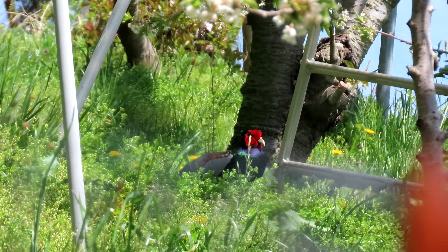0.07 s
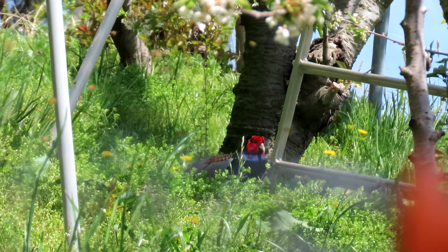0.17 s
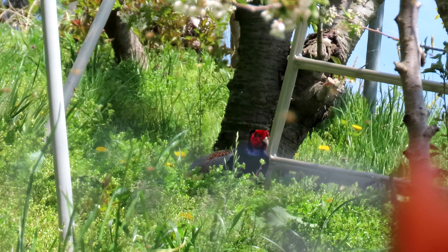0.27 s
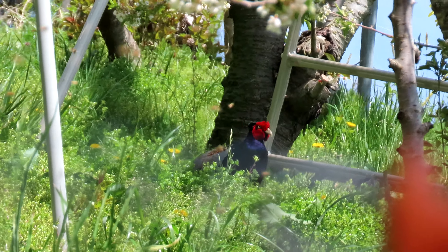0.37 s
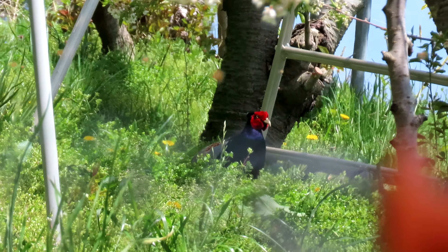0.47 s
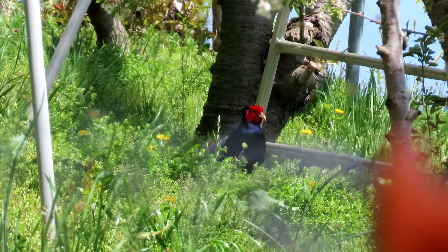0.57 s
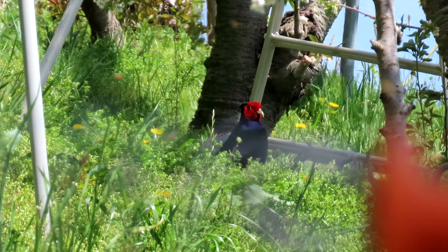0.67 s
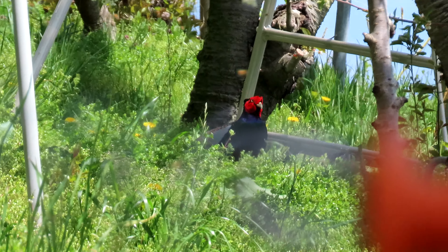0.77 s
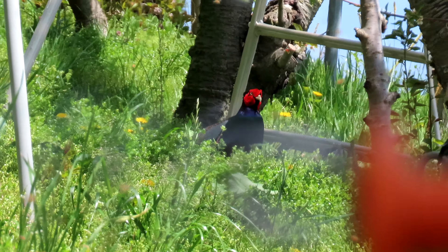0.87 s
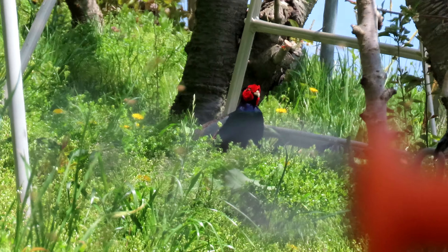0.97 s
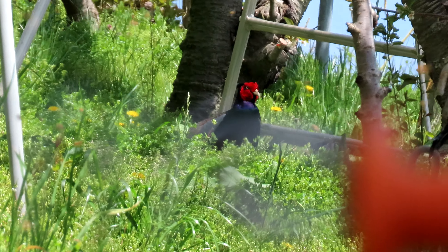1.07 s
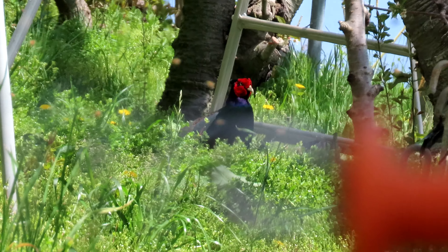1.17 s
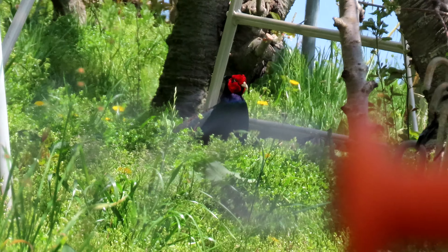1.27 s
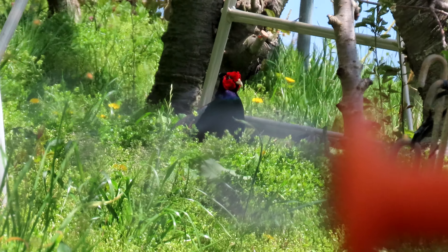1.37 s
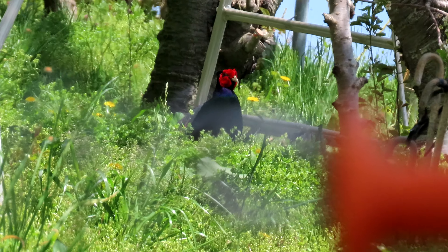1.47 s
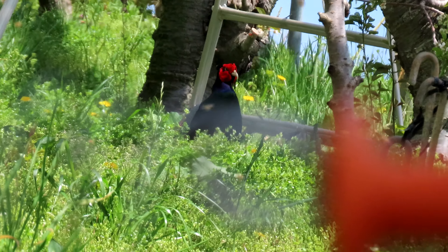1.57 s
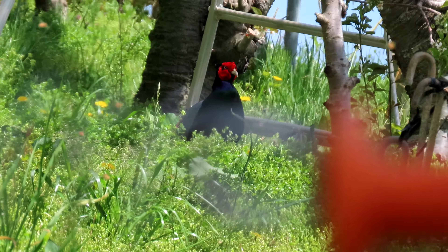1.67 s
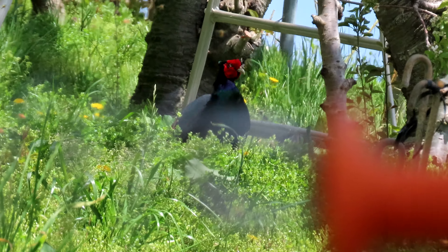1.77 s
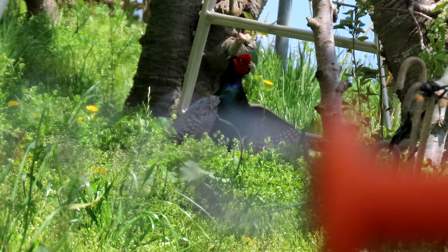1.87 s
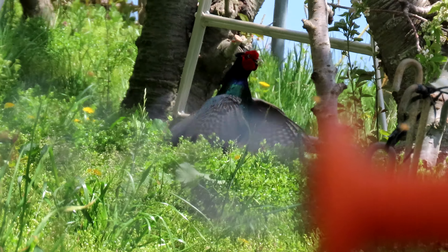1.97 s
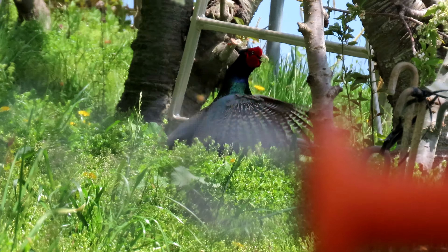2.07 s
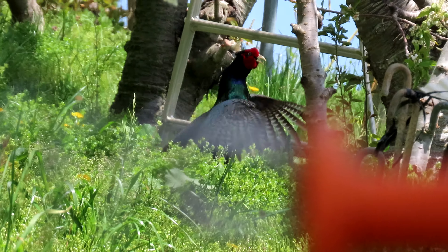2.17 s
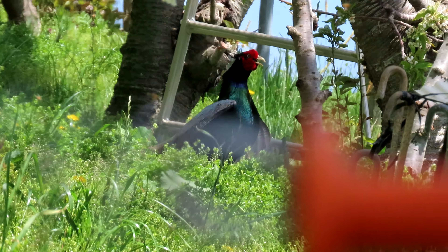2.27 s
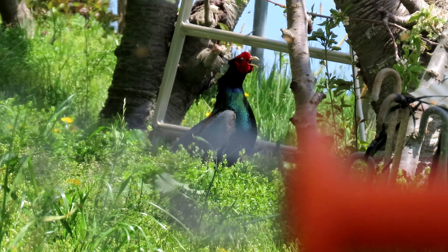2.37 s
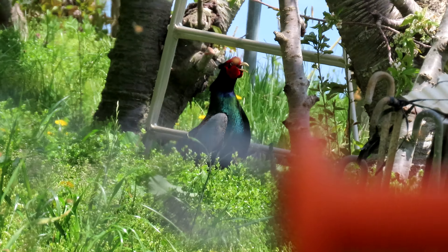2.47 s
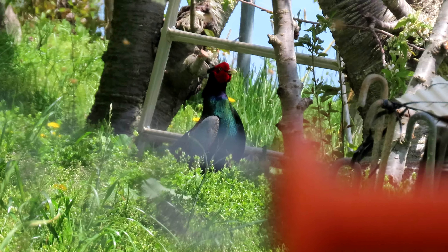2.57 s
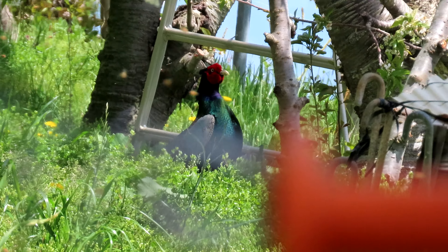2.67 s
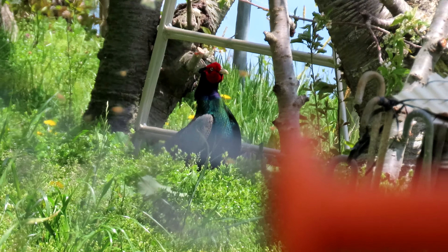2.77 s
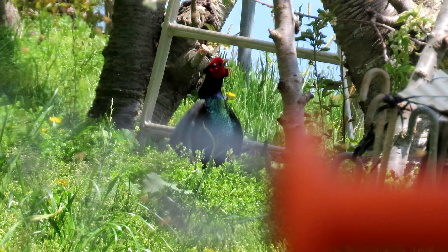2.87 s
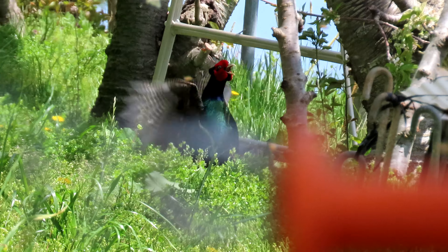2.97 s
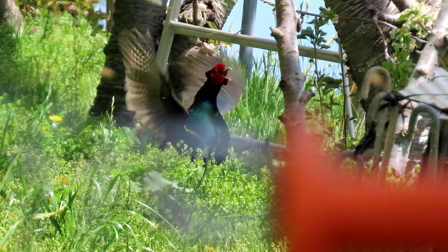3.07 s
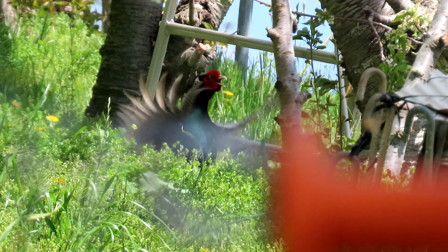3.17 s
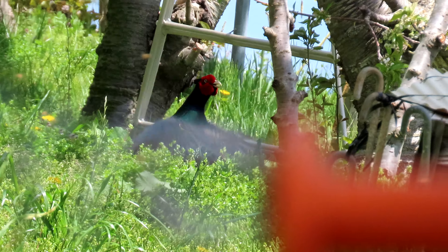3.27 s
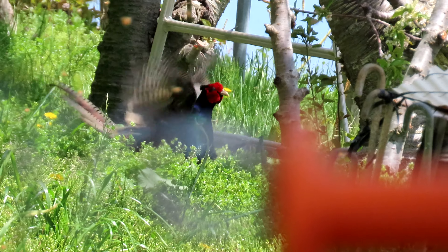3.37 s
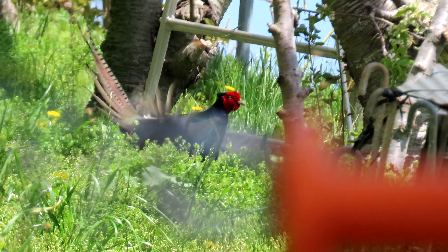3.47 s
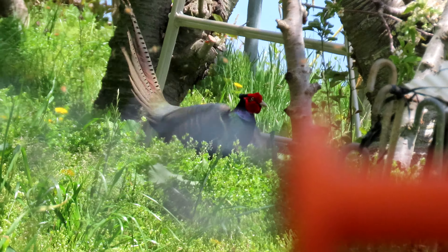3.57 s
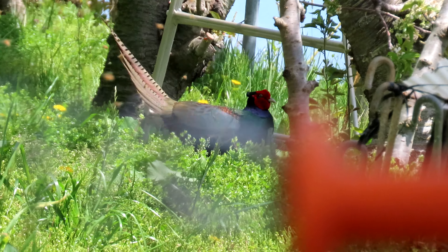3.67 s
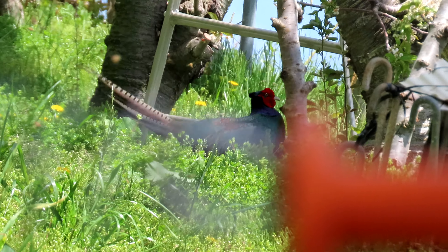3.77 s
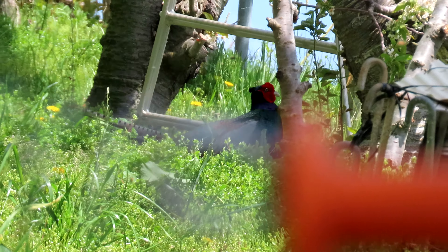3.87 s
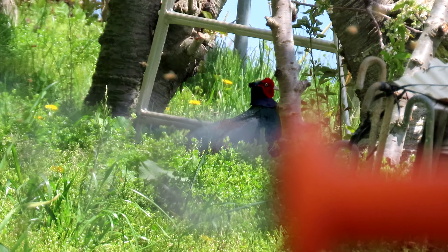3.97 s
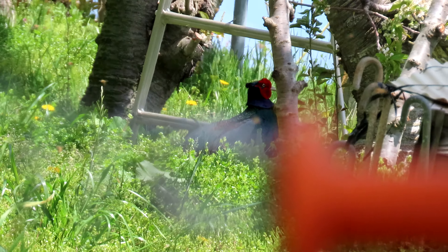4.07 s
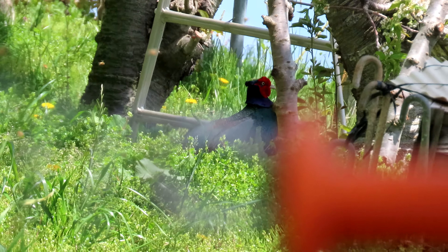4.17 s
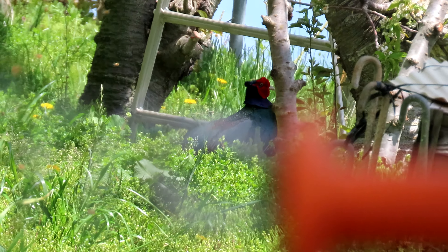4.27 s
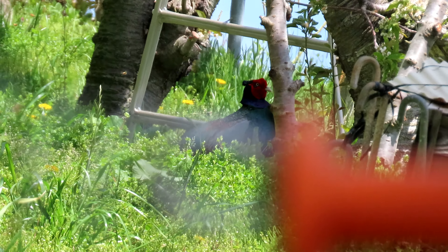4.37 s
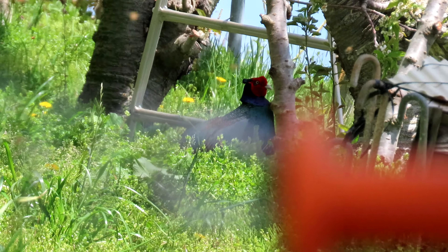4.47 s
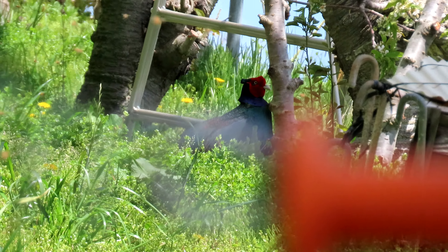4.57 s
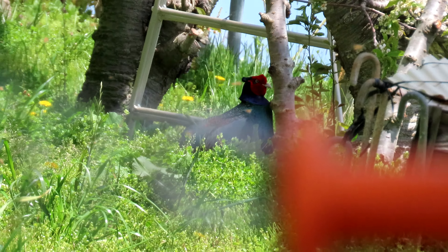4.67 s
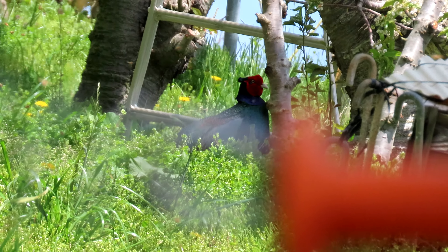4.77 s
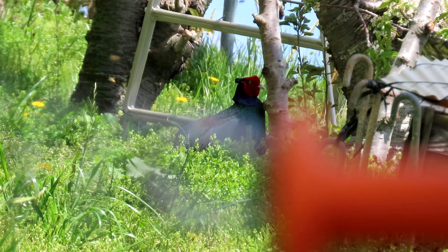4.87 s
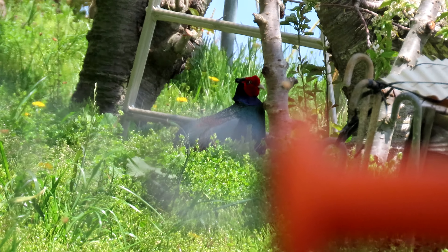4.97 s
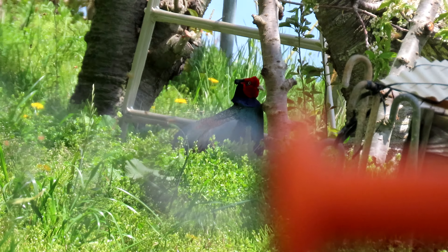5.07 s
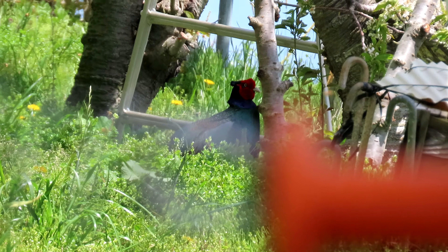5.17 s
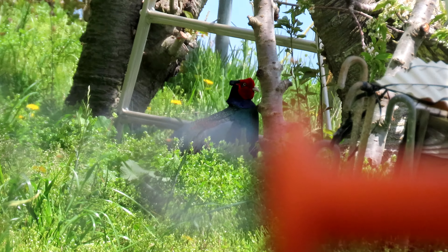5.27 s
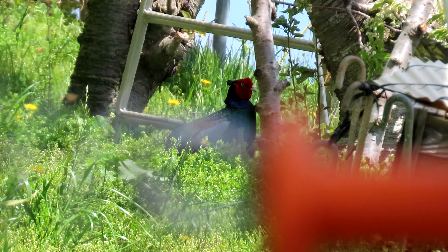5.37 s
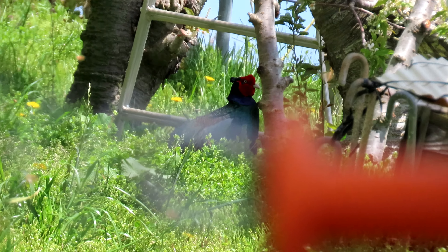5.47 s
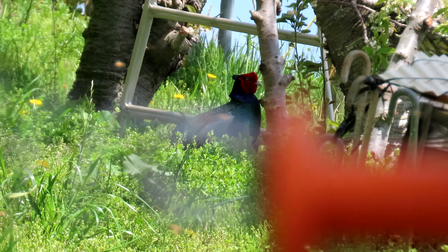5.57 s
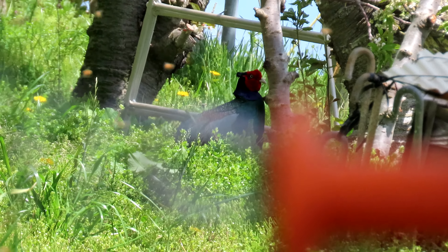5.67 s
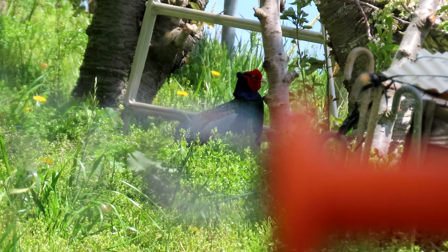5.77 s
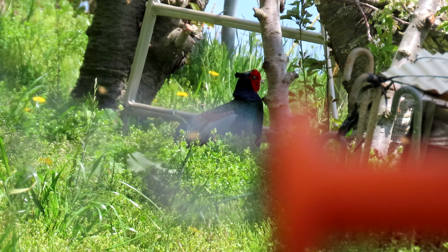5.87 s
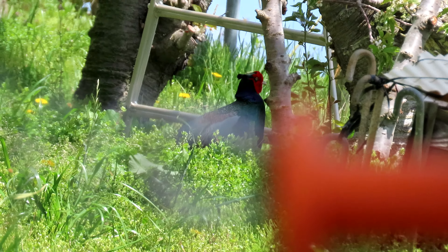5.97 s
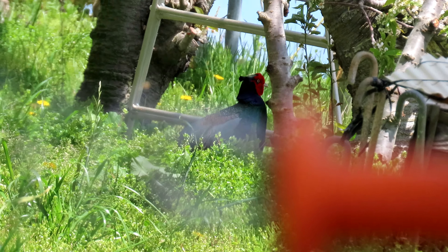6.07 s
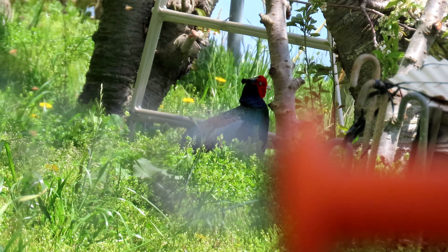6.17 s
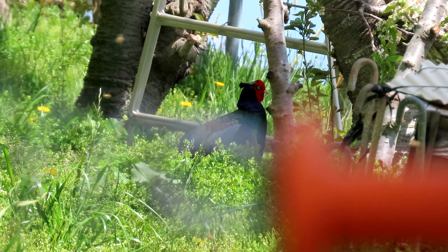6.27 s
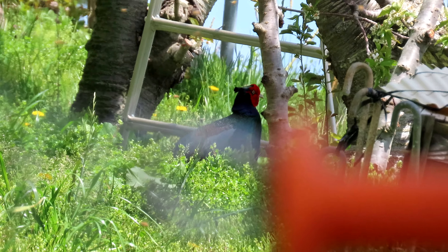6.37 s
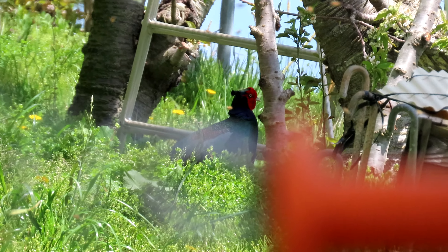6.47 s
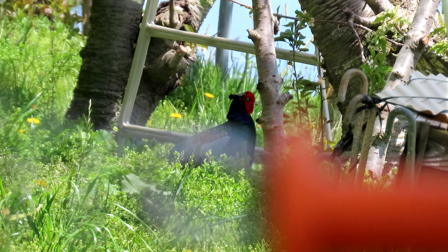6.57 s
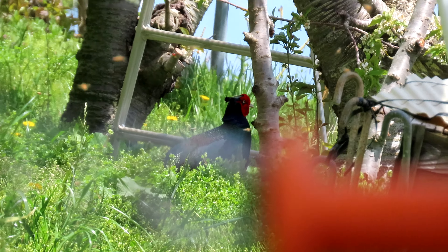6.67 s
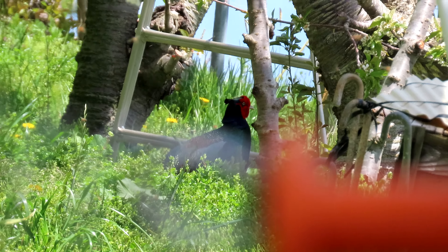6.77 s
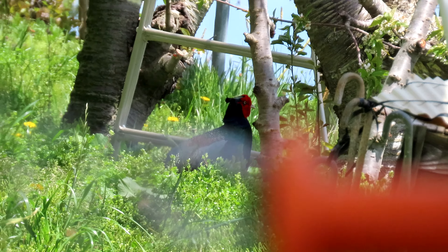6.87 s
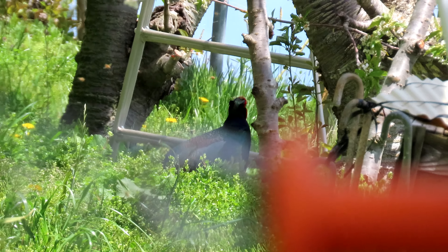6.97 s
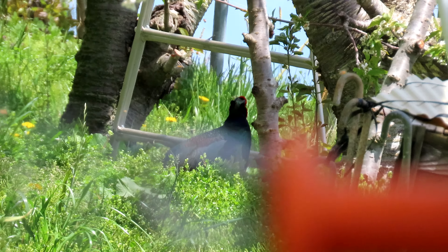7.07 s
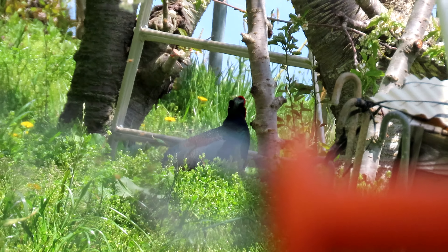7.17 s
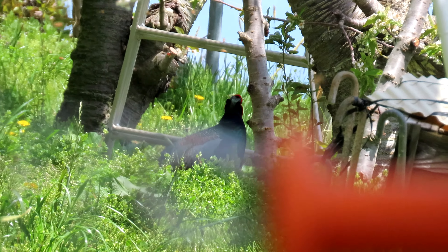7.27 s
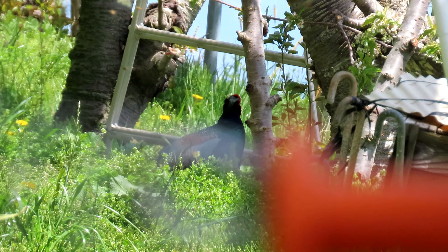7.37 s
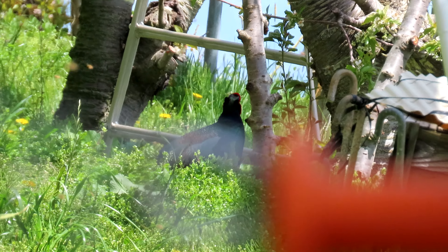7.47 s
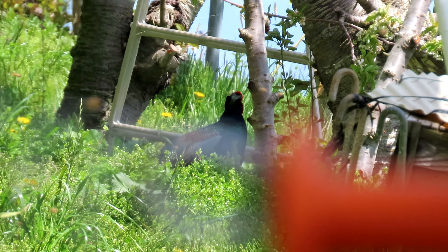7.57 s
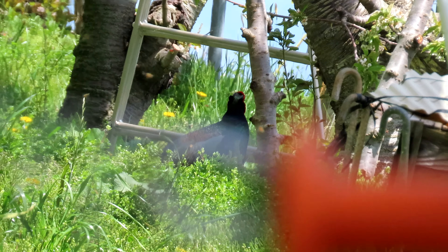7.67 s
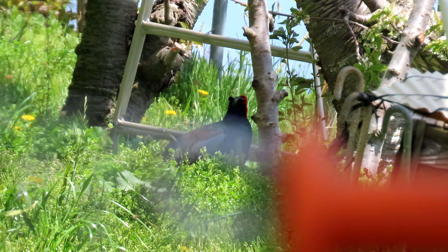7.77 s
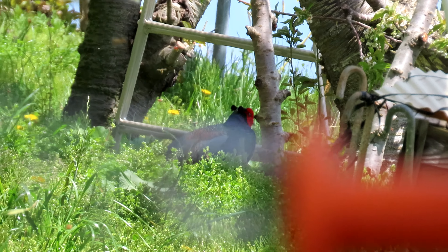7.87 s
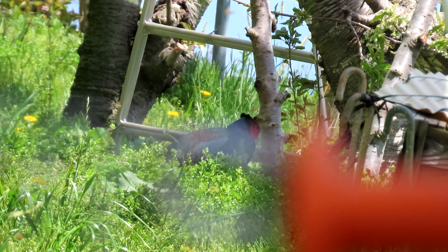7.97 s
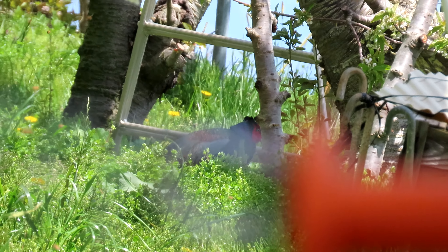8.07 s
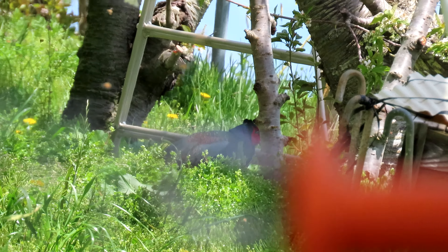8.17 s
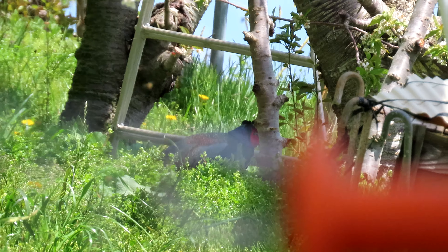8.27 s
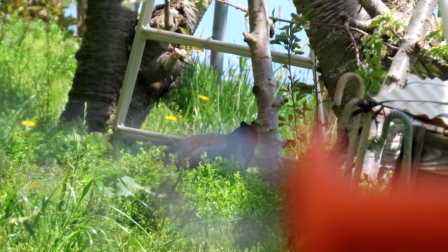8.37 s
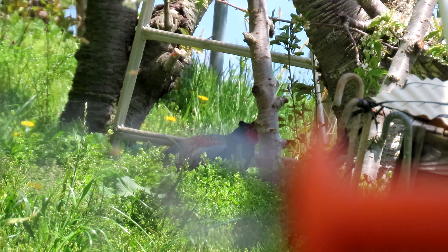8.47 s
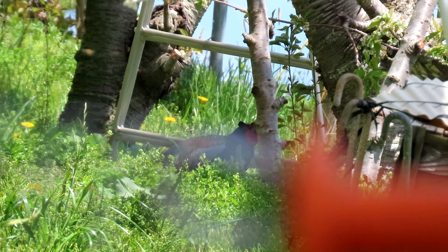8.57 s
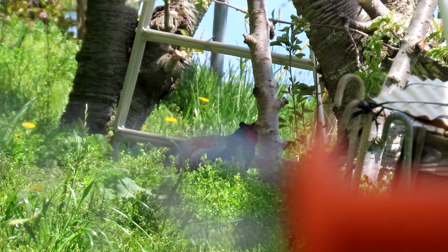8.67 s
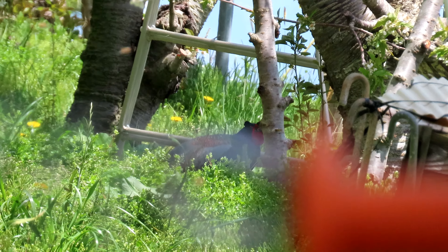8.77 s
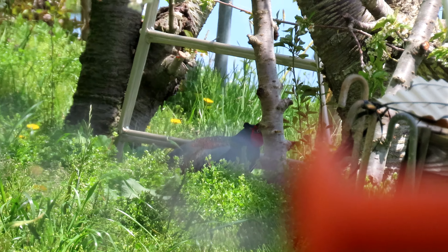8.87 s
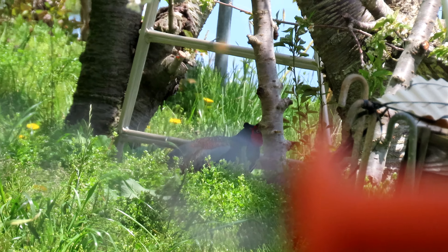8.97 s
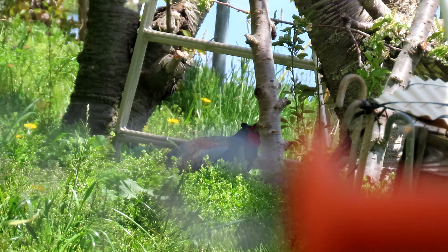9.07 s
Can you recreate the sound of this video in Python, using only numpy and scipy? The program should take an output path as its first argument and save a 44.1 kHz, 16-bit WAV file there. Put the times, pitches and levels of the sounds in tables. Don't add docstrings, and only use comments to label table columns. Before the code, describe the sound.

Lumpy wind rumble pushes on an open-air microphone over a steady, quiet background hush. After a clear rising small-bird chirp, a pheasant blurts two loud raspy honks, the second longer and brighter, followed by a rapid dry flurry of wing claps. Weak echoes come off the trees. Then calmer air, sparse high twittering far away and a very faint low drone.

```python
import sys
import numpy as np
from scipy import signal
from scipy.fft import rfft, irfft
from scipy.io import wavfile
from scipy.ndimage import uniform_filter1d

SR = 44100
rng = np.random.default_rng(int(sys.argv[2]) if len(sys.argv) > 2 else 0)


def digitize_waveform(pressure):
    field = np.atleast_2d(pressure).T
    bounded = np.clip(field, -1, 1)
    quanta = np.round(bounded * 32767).astype(np.int16)
    wavfile.write(sys.argv[1], SR, quanta)


def ratio(d):
    e = np.asarray(d, float) / 20
    return 10 ** e


N = 402741


def evened(x):
    return x / np.sqrt(np.mean(abs(x) ** 2) + 1e-20)


def read(points, hz):
    f, value = np.transpose(points)
    return np.interp(np.log(hz + 1), np.log(f + 1), value)


def add(mix, start_s, sound):
    part = mix[round(start_s * SR):][:len(sound)]
    part += sound[:len(part)]


def unfold(rows):
    s, *columns = np.transpose(rows)
    t = np.arange(s[0], s[-1], 1 / SR)
    return [np.interp(t, s, column) for column in columns]


def coloured(gain, size):
    spectrum = rfft(rng.standard_normal(size)) * gain(np.fft.rfftfreq(size, 1 / SR))
    return evened(irfft(spectrum, size))


def wander(hz, size):
    return coloured(lambda f: 1 / (1 + (f / hz) ** 4), SR)[:size]


def echoes(x, decay):
    stir = .8 + .55 * np.resize(wander(60, SR), N)
    taps = np.zeros(SR)
    at = np.arange(300, SR - 20, 20)
    taps[at + rng.integers(0, 20, len(at))] = rng.choice([-1., 1.], len(at))
    hz, t, z = signal.stft(taps, SR, nperseg=256)
    fade_db = -60 * t / read(decay, hz)[:, None]
    tail = signal.istft(z * ratio(fade_db), SR, nperseg=256)[1]
    return signal.fftconvolve(x * stir, tail / np.linalg.norm(tail))[:N]


def country_hush():
    # (frequency [Hz], level [dB per Hz])
    colour = [(35, -26), (60, -4), (87, -9.5), (254, -11), (414, -12.5), (522, -11), (560, -12),
              (600, -13.5), (813, -15), (1070, -15.5), (2320, -25), (5110, -31.5), (15600, -36.5)]
    # (frequency [Hz], level [dB])
    apart = [(60, -58), (110, -44), (200, -34), (380, -28), (700, -26.5), (1290, -26), (2380, -17.5),
             (4400, -12), (8120, -7.5), (15000, -5.5)]

    def colour_db(f):
        return read(colour, np.clip(f, 60, 15000))

    middle = coloured(lambda f: ratio(colour_db(f)) / (1 + (80 / (f + 1)) ** 4), N)
    side = coloured(lambda f: ratio(colour_db(f) + read(apart, f)), N)
    return ratio(-51.5) * (middle + ratio(-18.5) * np.outer([1, -1], side))


def gusts():
    # (time [s], buffet level [dB], pace of swell and fade [dB per s], flutter over buffet [dB])
    gust_rows = [(.18, -39, 120, -13), (.33, -41, 56, -13), (.66, -45, 45, -6.5), (.785, -41.5, 200, -1),
                 (1.12, -50, 42, -19), (1.4, -44.5, 48, -17), (1.74, -38.5, 150, -9),
                 (1.915, -33.5, 100, -5), (2.35, -38, 110, -6), (2.54, -40, 100, -16),
                 (2.655, -30.5, 120, -6), (2.755, -39, 120, 5), (2.97, -40.5, 78, -5),
                 (3.2, -37, 110, -4.5), (3.32, -30.5, 130, -10), (3.53, -39, 61, -6), (3.7, -30, 118, -3.5),
                 (3.8, -31, 80, -7.5), (4.13, -32, 66, -7), (4.42, -39, 32, -13.5), (4.72, -41, 110, -1.5),
                 (4.87, -36, 90, -10.5), (5.05, -41.5, 100, -14), (5.21, -44, 100, -6.5),
                 (5.54, -41, 120, -18), (5.82, -37.5, 60, -13.5), (6.02, -33, 94, -11), (7.8, -45, 68, -19),
                 (8.07, -42.5, 112, -15), (8.76, -46, 110, -1)]
    # (time [s], buffet level [dB])
    breeze = [
        (0, -64),
        (.5, -50.5),
        (5.5, -52.5),
        (6.5, -52.5),
        (6.8, -57),
        (7.3, -55.5),
        (8.3, -50.5),
        (9.13, -49.5),
    ]
    t = np.arange(0, N, 64) / SR
    s, db, pace, flutter_db = np.transpose(gust_rows)[:, :, None]
    breeze_db = np.interp(t, *np.transpose(breeze))
    fall_db = pace * abs(t - s)
    buffet = ratio(breeze_db) ** 2 + (ratio(db - fall_db) ** 2).sum(0)
    flutter = ratio(breeze_db - 12) ** 2 + (ratio(db + flutter_db - 1.5 * fall_db) ** 2).sum(0)
    return [np.interp(np.arange(N) / SR, t, np.sqrt(power)) for power in (buffet, flutter)]


def held(x, size):
    return evened(x / (uniform_filter1d(x ** 2, size) + .1) ** .2)


def wind():
    # (frequency [Hz], level [dB per Hz])
    rumble = [(4.7, -24), (8.0, -3), (22, 3.5), (39, -1.5), (72, -16.5), (119, -29.5), (150, -29),
              (200, -57), (330, -120)]
    strong, quick = gusts()
    buffet = coloured(lambda f: ratio(read(rumble, f)) / (1 + (f / 42) ** 8), N)
    flutter = coloured(
        lambda f: ratio(read(rumble, f)) / (1 + (42 / (f + 1)) ** 8) / (1 + (f / 140) ** 4), N)
    return strong * held(buffet, size=2500) + ratio(3.0) * quick * held(flutter, size=1200)


def note(start, length, from_hz, to_hz, db, peak_at, rise_db, fade_db, arch=0.):
    at = np.clip(peak_at, .05, .95)
    peak_hz = from_hz + (at + arch * (1 - at)) * (to_hz - from_hz)
    return [(start, from_hz, db - rise_db),
            (start + at * length, peak_hz, db),
            (start + length, to_hz, db - fade_db)]


def whistle(rows, warble, fuzz, over_db, strokes=0., buzz=0., trill_hz=60):
    hz, db = unfold(rows)
    size = len(hz)
    drop_hz = hz[0] - hz[-1]
    fall = np.clip(abs(drop_hz) / 1200, .25, 1)
    long_slide = (drop_hz > 400) * (size > 3500)
    saw = signal.sawtooth(2 * np.pi * 38 * np.arange(size) / SR, .2) * long_slide
    bend = 1 + strokes * saw + warble * fall * wander(trill_hz, size)
    turn = 2 * np.pi * np.cumsum(hz * bend) / SR
    burr = 1 - buzz * fall + buzz * fall * wander(290, size)
    tone = np.sin(turn) + ratio(over_db) * np.sin(2 * turn)
    level = np.sqrt(2) * ratio(db + fuzz * wander(78, size))
    return rows[0][0], level * burr * tone * signal.windows.tukey(size, .25)


def birds():
    # (start [s], length [s], from [Hz], to [Hz], level [dB])
    slides = [(4.515, .04, 4925, 4150, -64), (5.488, 0.12, 4830, 3350, -67), (5.68, .065, 7300, 5200, -68),
              (5.745, .03, 4920, 4500, -65), (5.842, .09, 5600, 4850, -65),
              (5.915, 0.098, 4540, 4100, -59.5), (5.998, 0.036, 4190, 3300, -57),
              (6.09, 0.038, 7000, 4600, -62.5), (6.167, 0.049, 3920, 3450, -65),
              (6.3, .03, 6980, 5150, -60.5), (6.337, .115, 5460, 4150, -58.5),
              (6.532, .028, 5000, 3250, -56), (6.69, 0.033, 7230, 5300, -62),
              (6.71, 0.053, 5500, 4500, -62), (6.76, .05, 4490, 3900, -65), (6.865, 0.047, 5100, 4600, -63),
              (6.899, 0.12, 3770, 3100, -61)]
    # (start [s], length [s], from [Hz], to [Hz], level [dB])
    tweets = [(0.0, .02, 5150, 5360, -66), (.035, .02, 4950, 5180, -69), (.125, .025, 4900, 5300, -68),
              (.165, .018, 4900, 5100, -68), (0.272, .035, 5050, 5700, -65), (0.35, .03, 5350, 5520, -66),
              (4.543, .045, 4150, 4200, -66), (4.75, .06, 3990, 4020, -71), (4.87, .04, 4900, 4780, -70),
              (6.14, 0.037, 4050, 4290, -59), (6.515, 0.02, 5220, 5100, -56.5),
              (6.584, 0.026, 3600, 3760, -60), (7.055, .015, 5480, 5550, -65),
              (7.125, 0.017, 3850, 3850, -62), (7.398, .105, 4290, 4340, -64.5),
              (7.643, .055, 4780, 4600, -65)]
    # (start [s], length [s], from [Hz], to [Hz], level [dB])
    chirps = [
        (2.025, 0.138, 3420, 3690, -54),
        (6.44, .1, 3150, 3420, -63.5),
        (.12, .035, 2500, 3250, -68),
        (.515, 0.12, 3650, 3850, -58.5),
        (.55, 0.096, 3620, 3520, -65),
    ]
    # (start [s], length [s], from [Hz], to [Hz], level [dB])
    hoot = (6.9, .68, 602, 595, -66)
    out = np.zeros(N)
    song = [note(*row, .7, 2, 2, arch=.3) for row in slides]
    song += [note(*row, 0.29, 4.4, 6) for row in tweets]
    for rows in song:
        add(out, *whistle(rows, warble=.024, fuzz=2.2, over_db=-40, strokes=.06, buzz=.7, trill_hz=120))
    clear = note(*chirps[0], 0.216, 7, 23, arch=1.0)
    add(out, *whistle(clear, warble=0.036, fuzz=1.7, over_db=-11))
    for row in chirps[1:]:
        rows = note(*row, .3, 6, 6, arch=1.)
        add(out, *whistle(rows, warble=0.05, fuzz=3.5, over_db=-30, buzz=1.2))
    add(out, *whistle(note(*hoot, .2, 3, 4), warble=0.005, fuzz=2.5, over_db=-30))
    return out


def crow(rows, lines, blur_hz, beak_db, shuts, uneven_db, grumble_db, crack_db):
    # (frequency [Hz], level [dB per Hz])
    rasp_colour = [(600, -26), (1400, -9.5), (2000, -4.5), (2800, -1.5), (3800, -17), (4400, 6),
                   (5400, -11), (6300, -12), (7500, -25), (11000, -33), (14000, -70)]
    hz, effort_db, share_db = unfold(rows)
    size = len(hz)
    t = np.arange(size) / SR
    octave_db = effort_db + share_db
    pitch_db = effort_db + 10 * np.log10(np.clip(1 - ratio(share_db) ** 2, .1, 1))
    odd_db = effort_db + uneven_db - 70 * (t / t[-1] - 0.44) ** 2
    strain_db = 0.1922 * (hz - 1169)
    upper_db = effort_db + beak_db - shuts * t + strain_db
    grumble_db = grumble_db - 60 * t
    turn = np.pi * np.cumsum(hz * (1 + 0.0073 * wander(140, size))) / SR
    low_db = {1: odd_db - 39, 2: pitch_db, 3: odd_db, 4: octave_db}
    low, upper = np.zeros(size), np.zeros(size)
    for k, db in lines:
        steady = {2: .95, 4: .72}.get(k, .6)
        spread_hz = blur_hz * k
        chance = wander(spread_hz, size) + 1j * wander(spread_hz, size)
        waver = steady + np.sqrt(.5 - .5 * steady ** 2) * chance
        line = np.sqrt(2) * (waver * np.exp(1j * k * turn)).real
        if k > 4:
            upper += ratio(db + 2.5 * wander(20, size)) * line
        else:
            low += ratio(low_db[k]) * line
    rasp = coloured(lambda f: ratio(read(rasp_colour, f)), size) * (1 + 0.51 * np.cos(turn))
    crack_db = crack_db * np.exp(-((t - .058) / .02) ** 2)
    grumble = coloured(lambda f: 1 / (1 + ((f - 950) / 110) ** 4), size)
    high = ratio(upper_db) * (ratio(-1.5) * evened(upper) + ratio(-7.5 + crack_db) * rasp)
    high = high * ratio(1.2 * wander(70, size))
    sound = low + high + ratio(grumble_db) * grumble
    return rows[0][0], sound * signal.windows.tukey(size, .03)


def gasp(rows):
    hz, db = unfold(rows)
    air = wander(400, len(hz)) * np.sin(2 * np.pi * np.cumsum(hz) / SR)
    return rows[0][0], ratio(db) * evened(air) * signal.windows.tukey(len(hz), .3)


def wing_claps(out):
    # (time [s], peak level [dB], ring [Hz], time to fade by 60 dB [s])
    claps = [
        (3.5216, -44, 3140, 0.019),
        (3.5746, -48, 3300, 0.022),
        (3.5934, -40.5, 3050, 0.015),
        (3.6446, -43, 4190, 0.02),
        (3.6632, -38, 3070, 0.017),
        (3.733, -41, 2930, 0.018),
        (3.7444, -50, 3360, 0.02),
    ]
    t = np.arange(3000) / SR
    for s, db, hz, t60 in claps:
        puff = coloured(lambda f: 1 / (1 + ((f - 3800) / 1000) ** 4), len(t))
        ring = np.sin(2 * np.pi * hz * t) + 0.43 * puff
        add(out, s, ratio(db - 1 - 60 * t / t60) * ring * np.minimum(t / 0.0016, 1))


def pheasant():
    # (time [s], pitch [Hz], effort [dB], share of the octave [dB])
    crows = [
        [(2.505, 1142, -44, -8), (2.521, 1151, -32.5, -5), (2.571, 1171, -27, -5.5), (2.591, 1167, -30, -11.5),
         (2.637, 1173, -27.5, -4.5), (2.691, 1163, -28, -5.5), (2.725, 1180, -40, -9)],
        [(3.06, 1108, -52, 3), (3.074, 1164, -32.5, -7.5), (3.12, 1202, -31.5, -2.5), (3.158, 1140, -31.5, 0.5),
         (3.19, 1173, -28, -9.5), (3.292, 1213, -32.5, -0.5), (3.326, 1167, -26.5, -5.5), (3.36, 1184, -26, -9),
         (3.38, 1164, -43, 2)],
    ]
    # (multiple of half the pitch, level [dB]
    tones = [
        [(1, -30), (2, 0), (3, -16), (4, -5), (5, -26), (6, -16.5), (7, -14), (8, -15), (9, -15), (10, -27),
         (11, -28.5), (12, -32), (13, -43)],
        [(1, -27), (2, 0), (3, -16), (4, -1), (5, -35), (6, -11.5), (7, -7), (8, -12), (9, -12), (10, -12),
         (11, -28), (12, -33), (13, -47)],
    ]
    # (start [s], length [s], from [Hz], to [Hz], level [dB])
    squeaks = [
        (2.497, .025, 2600, 2545, -49),
        (3.054, .028, 2820, 2720, -41),
        (3.366, .09, 3230, 3030, -42.5),
    ]
    # (start [s], length [s], from [Hz], to [Hz], level [dB])
    gasps = [
        (2.675, 0.12, 4610, 4500, -50),
        (3.36, 0.089, 4480, 4280, -42.5),
        (3.5, 0.34, 3700, 3690, -65.5),
    ]
    blur_hz = [15, 12]
    beak_db, beak_shuts_db_per_s = [-5.5, -1.5], [39, 43]
    uneven_db, grumble_db, crack_db = [-15, -16.5], [-46.5, -45.5], [1, 4.5]
    out = np.zeros(N)
    for voice in zip(crows, tones, blur_hz, beak_db, beak_shuts_db_per_s, uneven_db, grumble_db, crack_db):
        add(out, *crow(*voice))
    for row in squeaks:
        rows = note(*row, .35, 12, 6)
        add(out, *whistle(rows, warble=.07, fuzz=2.0, over_db=-11, buzz=1.1, trill_hz=250))
    for row in gasps:
        add(out, *gasp(note(*row, 0.33, 5, 15)))
    wing_claps(out)
    return out


def scene():
    # (frequency [Hz], time to fade by 60 dB [s])
    tree_decay = [(800, 0.16), (1200, 0.48), (2400, 0.55), (4500, 0.49), (8000, 0.052)]
    # (frequency [Hz], time to fade by 60 dB [s])
    leaf_decay = [(2500, 0.36), (8000, 0.21)]
    bird, song = pheasant(), birds()
    bird = bird + ratio(-16) * echoes(bird, tree_decay)
    song = ratio(2.0) * song + ratio(-2.5) * echoes(song, leaf_decay)
    return bird + song + wind() + country_hush()


def low_pass(x):
    return signal.sosfilt(signal.butter(12, 16740, fs=SR, output="sos"), x)


def record(dry):
    edge = signal.firwin(1023, 15770, window=("kaiser", 9), fs=SR)
    offset = dry + .0005
    return low_pass(signal.oaconvolve(offset, edge[None], "same"))


dry = scene()
out = record(dry)
digitize_waveform(out)
```